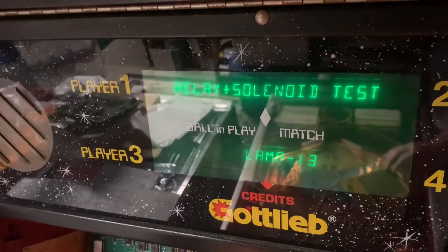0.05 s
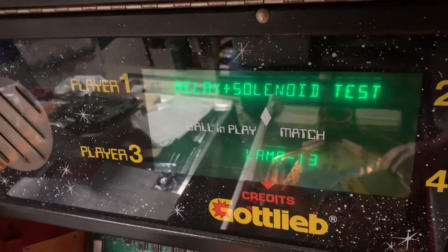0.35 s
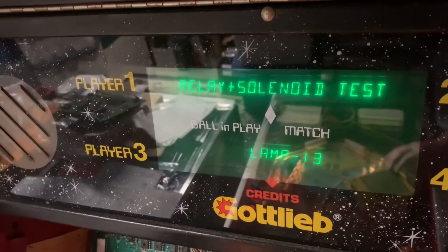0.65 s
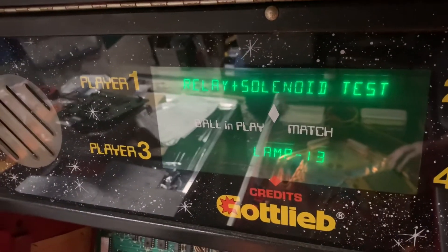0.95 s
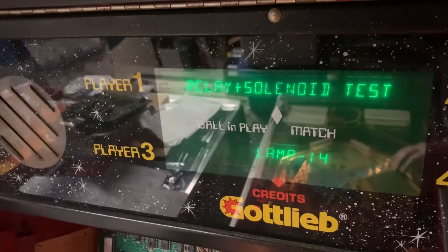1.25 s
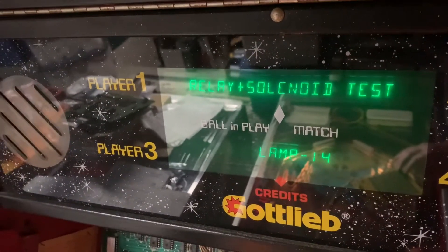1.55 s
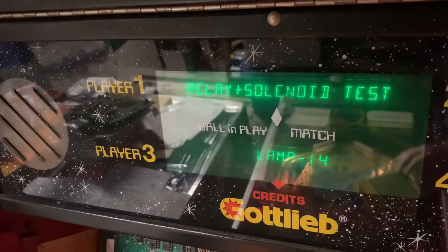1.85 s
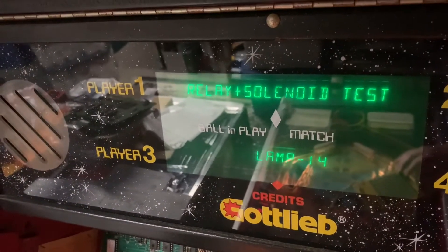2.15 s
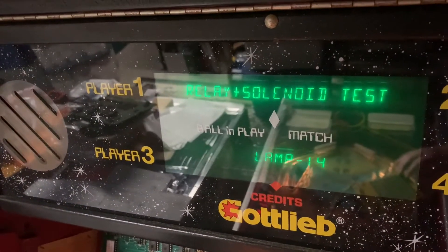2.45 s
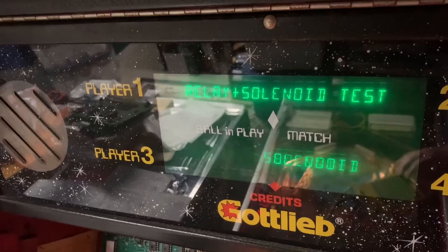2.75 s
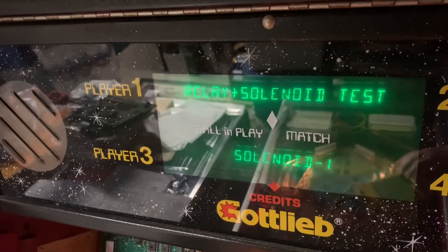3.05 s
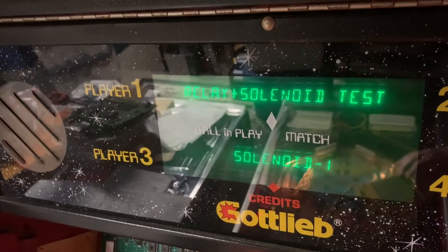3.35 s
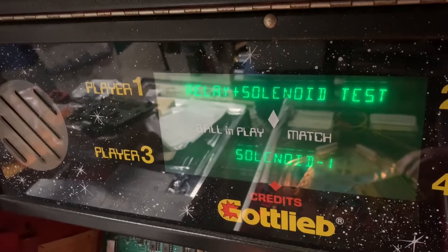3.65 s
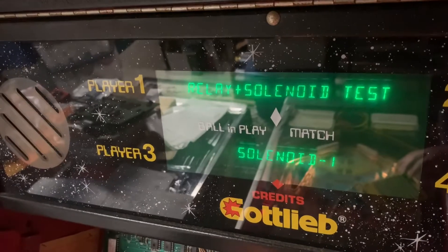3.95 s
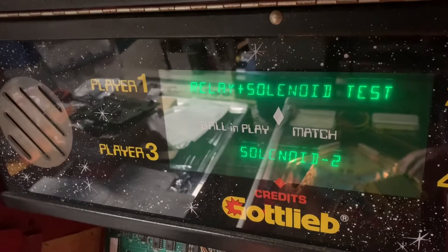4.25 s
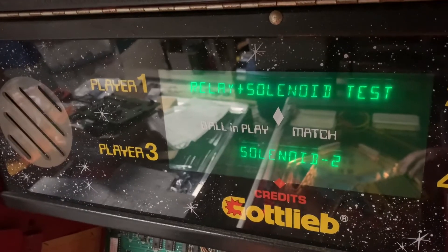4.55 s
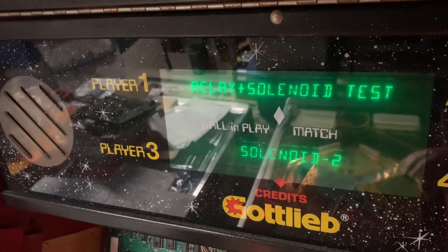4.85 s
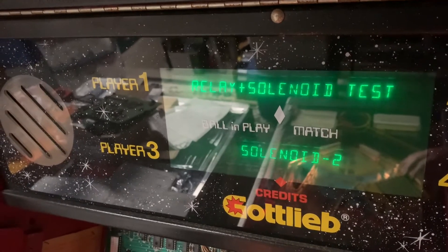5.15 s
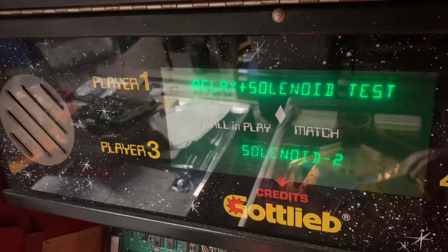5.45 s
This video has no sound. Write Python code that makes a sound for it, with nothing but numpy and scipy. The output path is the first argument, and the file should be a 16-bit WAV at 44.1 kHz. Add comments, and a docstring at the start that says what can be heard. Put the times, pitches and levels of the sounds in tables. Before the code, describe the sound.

A pinball machine hums low and steady as it tests its coils. A switch clicks faintly, then a relay snaps in, chatters and drops out with a brief springy ring. Two solenoids follow in turn, each pulling in with a short scrape and a hard clack that shakes the wooden cabinet, then releasing with a softer knock. A faint tap comes at the end. The microphone is close, in a quiet room.

```python
"""A pinball machine tests its coils, heard close to the backbox, over the hum of its transformer.
A switch clicks faintly. At 1.2 s a relay pulls in; its contacts chatter, it drops out, and its spring
rings on. Two solenoids (magnet coils) pull in and drop out in turn, at 2.8 s and 4.2 s. Each time the
armature, the moving iron part, scrapes along, hits its stop and shakes the wooden cabinet.
A third solenoid just begins to fire at the end."""
import sys
import numpy as np
from scipy import signal
from scipy.fft import rfft, irfft
from scipy.io import wavfile

SR = 44100
rng = np.random.default_rng(int(sys.argv[2]) if len(sys.argv) > 2 else 0)


def wav_record(signal):
    """Record a signal, one row per channel, as 16-bit PCM in the file named by sys.argv[1]."""
    frames = np.transpose(np.atleast_2d(signal))
    bounded = np.clip(frames, -1, 1)
    # unit amplitude maps onto the largest positive 16-bit level
    quanta = np.round(bounded * 32767).astype(np.int16)
    wavfile.write(sys.argv[1], SR, quanta)


N = 246959

# The transformer's tones. Each row: pitch in Hz, average level in dB.
HUM_TONES = [(59.6, -62), (119.6, -62), (179.5, -88.5), (479, -87.5), (576, -95), (689, -97), (8963, -100)]
# The tone colour of the room's air. Each row: frequency in Hz, relative level in dB.
AIR_COLOUR = [(12, -36.5), (20, -4.5), (48, -8.5), (123, -5), (146, -10), (216, -25), (410, -28.5),
              (485, -25.5), (698, -37.5), (949, -34), (1120, -37.5), (6540, -45.5), (8410, -58),
              (11100, -43), (16000, -67)]
# An armature slides. Each row: start in seconds, part, level in dB, brightness in dB per octave,
# pitch of its ring in Hz, level of that ring in dB against the scrape.
SCRAPE_EVENTS = [ (1.193, "relay core", -30.5, 0, 522, -9), (2.821, "coil 1 stop", -41, -2, 558, -1),
                 (3.181, "coil 1 rest", -41, 0.9, 5960, -12.5), (4.202, "coil 2 stop", -31, -5.5, 375, 2), ]
# A moving part strikes. Each row: start in seconds, part, level in dB, brightness in dB per octave,
# rise time in seconds.
BLOW_EVENTS = [ (0.2172, "switch", -44, -1.5, 0.0045), (1.2206, "relay core", -23.5, -2.5, 0.0006),
               (1.2845, "relay core", -30, 0.3, 0.0071), (1.3240, "relay core", -31, 0.8, 0.0023),
               (1.483, "relay rest", -44, -5, 0.005), (1.5153, "relay rest", -26, -2, 0.006),
               (1.5645, "relay rest", -28.5, -1, .003), (2.8611, "coil 1 stop", -23, -2, 0.0015),
               (3.2425, "coil 1 rest", -31, 1, 0.0023), (4.2386, "coil 2 stop", -23, -2.5, 0.0015),
               (4.5086, "coil 2 rest", -45.5, -2, 0.003), (4.5448, "coil 2 rest", -43.5, 0.5, 0.0031),
               (4.5885, "coil 2 rest", -31, 1.24, 0.0042), (5.587, "coil 3 stop", -45.5, 0, 0.0034), ]
# The tone colour of each part's clatter. Each row: frequency in Hz, relative level in dB.
CLATTER_COLOUR = { "switch": [(60, -26), (130, 0), (220, -7), (400, 2), (650, -5), (1000, -6.5),
                  (1500, 0.5), (2200, -10), (3200, -8), (4500, -8.5), (6800, -4.5), (8800, -20),
                  (11000, -19), (15000, -29)], "relay core": [(60, -30), (130, -11), (220, 0.5), (400, -1),
                  (650, -0.5), (1000, -3.5), (1500, -1), (2200, -3.5), (3200, 0), (4500, 0), (6800, -10),
                  (8800, -5), (11000, -1.5), (15000, -11.5)], "relay rest": [(60, -22), (130, -1),
                  (220, -10.5), (400, -4.5), (650, -5.5), (1000, -7.5), (1500, -4.5), (2200, -4.5),
                  (3200, -3), (4500, 2), (6800, -4), (8800, -8), (11000, 1.5), (15000, -12)],
                  "coil 1 stop": [(60, -11), (130, 2.5), (220, -4), (400, -9), (650, -6.5), (1000, -19.5),
                  (1500, -17.5), (2200, -15), (3200, -14), (4500, -10), (6800, -11.5), (8800, -13),
                  (11000, -20), (15000, -25.5)], "coil 1 rest": [(60, -11), (130, 7), (220, 6), (400, -5),
                  (650, -1), (1000, -11), (1500, -17.5), (2200, -18), (3200, -19), (4500, -18), (6800, -24),
                  (8800, -19), (11000, -20), (15000, -33.5)], "coil 2 stop": [(60, -11), (130, -5.5),
                  (220, -7.5), (400, -11.5), (650, -12), (1000, -15), (1500, -16), (2200, -11.5),
                  (3200, -13), (4500, -11.5), (6800, -13.5), (8800, -12.5), (11000, -16), (15000, -24)],
                  "coil 2 rest": [(60, 10.5), (130, 1), (220, 5), (400, -2.5), (650, -6.5), (1000, -15.5),
                  (1500, -18.5), (2200, -18.5), (3200, -16), (4500, -16), (6800, -20), (8800, -25),
                  (11000, -22), (15000, -35.5)], "coil 3 stop": [(60, -20), (130, -8), (350, 4), (650, 0),
                  (1500, -14), (4500, -19), (7000, -19), (11000, -20), (15000, -32)], }
# How clatter dies in cabinet and room. Each row: frequency in Hz, basic time to fade by 60 dB in seconds,
# extra level of the first crack in dB, level of the echo in dB against the ring.
CLATTER_FADE = [(90, 0.39, -14, -21), (290, .23, -8.5, -21), (750, .22, -13.5, -37.5),
                (2100, 0.21, -10.5, -44.5), (5000, 0.17, -3.5, -50.5), (12000, .16, 7, -60)]
# The clear tones of each struck part; the lowest are cabinet panels.
# Each row: pitch in Hz, relative level in dB, time to fade by 60 dB in seconds.
PART_TONES = { "switch": [(296, -5.5, 0.39), (445, -14, 0.44), (625.5, -1.5, 0.19), (1117, -3.5, 0.17),
              (1295, -0.5, 0.2), (5980, -0.5, 0.12)], "relay core": [(73.3, -15.5, 0.98), (131, -14.5, 1),
              (172, -0.5, .25), (195, 0, 0.24), (292, -5.5, 0.39), (518, -13.5, 0.41), (1013, -12.5, 0.36),
              (1180, -4.5, 0.21), (1427, -2.5, 0.13), (1850, -12.5, 0.35), (3360, -12.5, .3),
              (3789, -15.5, .2), (6190, -19.5, 0.26), (6500, -17.5, 0.49), (10500, -14, .22),
              (12200, -12, .3)], "relay rest": [(68.8, -15.5, 0.58), (131.1, -11.5, 0.65), (161, -18, 0.53),
              (297.8, -13, 0.66), (524, -7, 0.25), (820, -14.5, 0.22), (1123, -43, 0.98), (1210, 0, 0.18),
              (1493, -13.5, 0.26), (1727, -16.5, 0.56), (2000, -23, .33), (4540, -18, .29),
              (11400, -13, 0.3), (2925, -23, .55), (5346, -14.5, .67), (6724, -18, .47)],
              "coil 1 stop": [(70.8, 1, 0.49), (133.8, 5.5, 0.46), (192.4, -0.5, .2), (223, -0.5, 0.078),
              (316, 6.5, 0.2), (468, -9, .2), (525, -5.5, .24), (627, -5.5, 0.22), (728, -9, .17),
              (961, -13.5, 0.3), (1608, -13.5, .27), (1640, -35, 1), (4450, -10, .08), (6066, -11.5, .08),
              (6500, -5, .08), (7310, 3.5, 0.059)], "coil 1 rest": [(76.4, 2, 0.42), (126.2, 3, 0.41),
              (187, 1, 0.248), (214, 17, 0.13), (289, 2, 0.27), (470, 4, 0.16), (510, 1.5, 0.19),
              (636, 5, 0.15), (758, -2, 0.2), (1153, -8.5, 0.2), (1690, -23.5, 0.38), (6400, -25.5, 0.14),
              (10300, 12, 0.047), (11760, 9.5, 0.081)], "coil 2 stop": [(99, -2.5, 0.11), (129.5, -3, 0.31),
              (191.4, 7.5, 0.11), (205.3, 13.5, .095), (267.7, -2, 0.22), (320.6, 2, 0.11),
              (409, -12, 0.225), (511, -12.5, 0.27), (628, -3, 0.12), (886, -13, 0.12), (1451, -6.5, 0.13),
              (2023, -15.5, 0.14), (2540, -11, .12), (4100, -2, .09), (6160, -4, .08), (9170, -8.5, 0.07)],
              "coil 2 rest": [(69.9, -7.5, 0.67), (131.8, -0.5, 0.365), (210.8, 20, 0.11),
              (266.7, 19, 0.075), (283.4, 3.5, 0.34), (472, -8.5, .3), (590, 2, 0.13), (840, -4.5, 0.2),
              (1400, -6.5, 0.18), (4350, -17, .12), (4700, -13, 0.27), (5980, -8, 0.079),
              (11700, -24, .08)], "coil 3 stop": [(340, 0, .15)], }
# How each part rings. Each entry: a factor that stretches its clatter, extra level of its tones in dB.
PART_RING = {"switch": (0.99, 1.7), "relay core": (1.6, 0.5), "relay rest": (1.64, 2),
             "coil 1 stop": (1.057, -1.5), "coil 1 rest": (1.1, -1), "coil 2 stop": (1.06, 2.5),
             "coil 2 rest": (1.0, 0.95), "coil 3 stop": (1.0, 0)}
# How alike the two microphones sound. Each row: frequency in Hz, likeness from 0 to 1.
MIC_LIKENESS = [(220, 0.87), (800, 0.36), (1300, 0.61), (2200, 0.25), (5800, .4), (7000, .72), (8600, 1),
                (15000, 0.51)]
# How far the left side's wave runs ahead of the right. Each row: frequency in Hz, lead in radians.
LEFT_LEAD = [(700, 0), (1300, .9), (3000, 2.6), (5500, 3), (6200, .3), (8500, -3.1), (11000, -6.3),
             (13400, -9.4), (15200, -12.3)]
# Which side is louder. Each row: frequency in Hz, left minus right in dB.
LEFT_BALANCE = [(300, -0.15), (750, -0.5), (1200, 0.6), (3000, -0.86), (5500, -3.5), (7000, -0.5),
                (15000, 0.5)]
# Each part's own random pattern of small resonances.
RIPPLES = {part: rng.standard_normal(400) for part in CLATTER_COLOUR}

TOP_HZ = 16000
AGE = np.arange(SR) / SR  # seconds since a blow or scrape began


def amp(db):
    """Turns decibels into a factor to multiply by."""
    return 10 ** (np.asarray(db) / 20)


def look_up(table, hz):
    """Reads between a table's rows, with every octave equally wide."""
    row_hz, values = np.transpose(table)
    return np.interp(np.log(hz + 1), np.log(row_hz), values)


def unit_level(x):
    """Scales a signal to an average (rms) level of 1."""
    return x / np.sqrt(np.mean(x ** 2) + 1e-20)


def add(mix, start, sound):
    """Mixes in a stereo sound at a start time in seconds."""
    span = mix[:, round(start * SR):][:, :sound.shape[1]]
    span += sound[:, :span.shape[1]]


def wander(size, rate):
    """A smooth random curve that changes about rate times a second."""
    hz = np.fft.rfftfreq(size, 1 / SR)
    return unit_level(irfft(rfft(rng.standard_normal(size)) / (1 + (hz / rate) ** 4), size))


def microphones(hz):
    """How strongly and how early a frequency sounds on the left and right side."""
    side = np.array([[1], [-1]])
    return amp(side * look_up(LEFT_BALANCE, hz) / 2) * np.exp(.5j * side * look_up(LEFT_LEAD, hz))


def noise_spectrum(colour, tilt_db, size):
    """Frequencies and a random stereo spectrum of the given colour, tilted around 1 kHz."""
    hz = np.fft.rfftfreq(size, 1 / SR)
    left, other = np.exp(2j * np.pi * rng.random((2, len(hz))))
    likeness = np.clip(look_up(MIC_LIKENESS, hz), 0, 1)
    right = likeness * left + np.sqrt(1 - likeness ** 2) * other
    octaves = np.log2(np.maximum(hz, 150) / 1000)
    gain = amp(look_up(colour, hz) + tilt_db * octaves) * (hz < TOP_HZ)
    return hz, gain * microphones(hz) * np.array([left, right])


def room_air(level_db=-64.5):
    """The faint, low rush of a still room."""
    _, spectrum = noise_spectrum(AIR_COLOUR, 0, N)
    return amp(level_db) * unit_level(irfft(spectrum, N))


def transformer_hum():
    """Mains current makes the transformer hum in slightly unsteady tones."""
    t = np.arange(N) / SR
    hum = 0
    for hz, db in HUM_TONES:
        waver = 1 + 0.13 * wander(N, rate=7)
        hum += amp(db) * np.sqrt(2) * waver * np.sin(2 * np.pi * (hz * t + rng.random()))
    return hum


def clatter_bands(part, tilt_db, low_hz=55, ripple_db=5.5):
    """A part's countless close tones blur into noise, split here into the bands of CLATTER_FADE."""
    hz, spectrum = noise_spectrum(CLATTER_COLOUR[part], tilt_db, SR)
    spectrum *= hz ** 3 / (hz ** 3 + low_hz ** 3)  # the panels cannot give off deep bass
    ripple_hz = np.linspace(0, np.sqrt(TOP_HZ), len(RIPPLES[part])) ** 2
    ripple = np.clip(np.interp(hz, ripple_hz, RIPPLES[part]), -2, 2)
    spectrum *= amp(ripple_db * ripple * hz / (hz + 700))  # steel rings above the wood
    centres = [row[0] for row in CLATTER_FADE]
    shares = [look_up(list(zip(centres, one_band)), hz) for one_band in np.eye(len(centres))]
    bands = np.array([irfft(spectrum * share, SR) for share in shares])
    return bands / np.std(bands.sum(0))


def armature_scrape(duration, part, tilt_db, ring_hz, ring_db, rise_s=0.014, fade_s=0.13, stop_s=0.0089):
    """The sliding armature rubs grittily and keeps one tone of its guide ringing."""
    swell = 1 - np.exp(-(AGE / rise_s) ** 2)
    fade = np.exp(-AGE / fade_s - np.maximum(AGE - duration, 0) / stop_s)
    grit = clatter_bands(part, tilt_db).sum(0) * amp(2 * wander(SR, rate=200))
    waver = wander(SR, rate=70) + 1j * wander(SR, rate=70)
    ring = (microphones(ring_hz) * waver * np.exp(2j * np.pi * ring_hz * AGE)).imag
    return swell * fade * (grit + amp(ring_db) * ring)


def clack(part, tilt_db, rise_s, crack_db, stretch, crack_fade_s=0.06, echo_fade_s=0.94):
    """Steel hits steel: a short crack, the rattling ring of the cabinet and a faint room echo."""
    sound = 0
    for band, (hz, fade_s, extra_db, echo_db) in zip(clatter_bands(part, tilt_db), CLATTER_FADE):
        crack = amp(crack_db + extra_db - 60 * AGE / crack_fade_s)
        ring = amp(-60 * AGE / (fade_s * stretch))
        echo = amp(echo_db - 60 * AGE / echo_fade_s)
        swell = 1 - np.exp(-AGE / (rise_s + 1.4 / hz))  # low bands take longer to build
        sound += band * swell * np.sqrt(crack ** 2 + ring ** 2 + echo ** 2)
    sound *= amp(0.5 * wander(SR, rate=450) * np.exp(-AGE / .05))  # tiny rebounds
    return sound / np.std(sound[:, :SR // 20])


def ringing_tones(part, steady_hz=2500):
    """A struck part's own fading tones; reflections make the lower ones waver."""
    sound = 0
    for hz, db, fade_s in PART_TONES[part]:
        build_s = 1.1 / hz * (1 + 45 / hz) + 0.0027  # the big panels are slow to get moving
        envelope = amp(db - 60 * AGE / fade_s) * (1 - np.exp(-(AGE / build_s) ** 2))
        reflections = .35 * (wander(SR, rate=12) + 1j * wander(SR, rate=12))
        waver = 1 + reflections * (1 - np.exp(-AGE / .04)) / (1 + (hz / steady_hz) ** 2)
        # each microphone has its own spot in the standing wave
        spot = np.exp(.9j * hz / (hz + 1500) * rng.standard_normal((2, 1)))
        sound += envelope * (microphones(hz) * spot * waver * np.exp(2j * np.pi * hz * AGE)).imag
    return sound


def hardest_blow(part):
    """The time and level of the blow that drives a part home."""
    hits = [(start, db) for start, struck, db, _, _ in BLOW_EVENTS if struck == part]
    return max(hits, key=lambda hit: hit[1])


def blow(part, db, tilt_db, rise_s):
    """One strike of a switch, relay or solenoid. Light touches and rebounds crack and ring less."""
    softer_db = hardest_blow(part)[1] - db
    stretch, tones_db = PART_RING[part]
    clatter = clack(part, tilt_db, rise_s, crack_db=5.5 - 2 * softer_db, stretch=stretch)
    tones = amp(tones_db - 0.7 * softer_db) * ringing_tones(part)
    return amp(db) * (clatter + tones)


def scene(settle_s=.009):
    """Lays every scrape and blow over the hum and the room's air."""
    mix = transformer_hum() + room_air()
    for start, part, db, tilt_db, ring_hz, ring_db in SCRAPE_EVENTS:
        duration = hardest_blow(part)[0] + settle_s - start  # it scrapes on briefly after hitting home
        add(mix, start, amp(db) * armature_scrape(duration, part, tilt_db, ring_hz, ring_db))
    for start, part, db, tilt_db, rise_s in BLOW_EVENTS:
        add(mix, start, blow(part, db, tilt_db, rise_s))
    return mix


def record(dry, low_cut_hz=42):
    """The microphones drop the deepest bass; then the highest treble is cut."""
    bass_cut = signal.butter(3, low_cut_hz, "high", fs=SR, output="sos")
    treble_cut = signal.firwin(255, TOP_HZ, window=("kaiser", 9), fs=SR)
    return signal.oaconvolve(signal.sosfilt(bass_cut, dry), treble_cut[None], "same")


dry = scene()
out = record(dry)
wav_record(out)
```